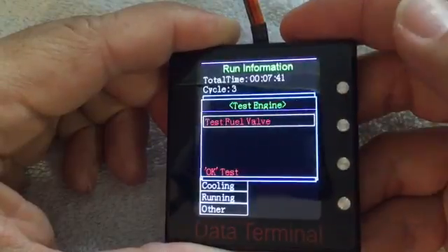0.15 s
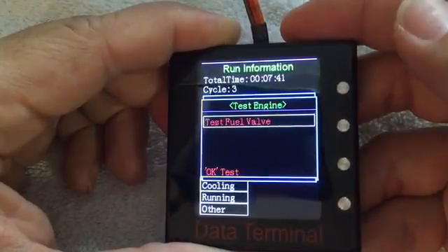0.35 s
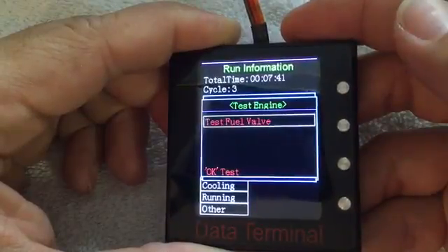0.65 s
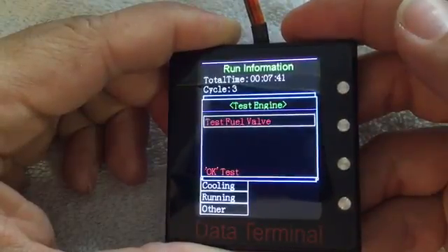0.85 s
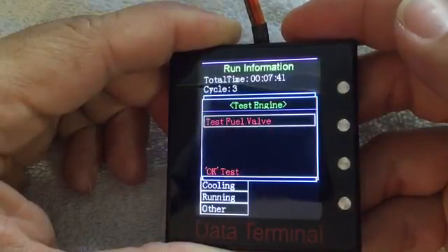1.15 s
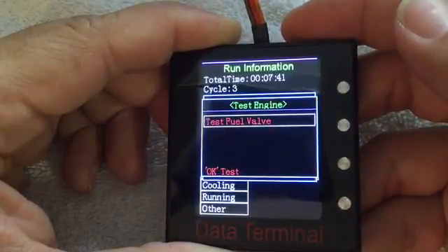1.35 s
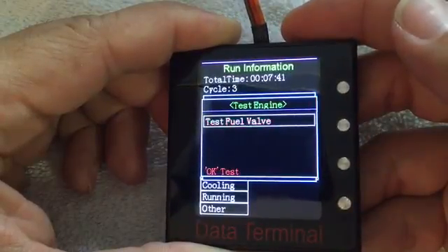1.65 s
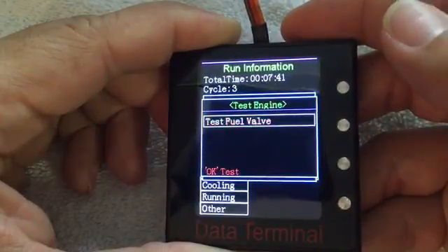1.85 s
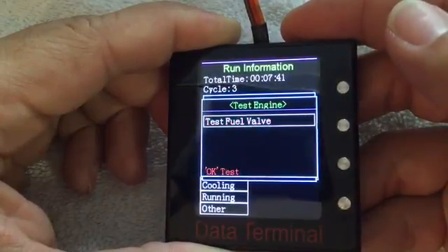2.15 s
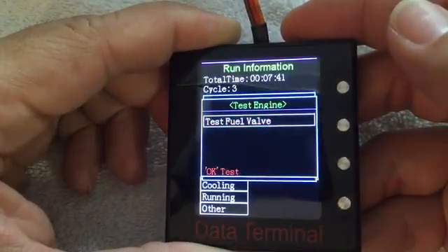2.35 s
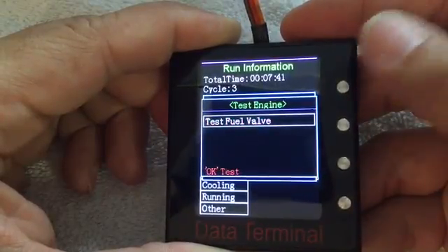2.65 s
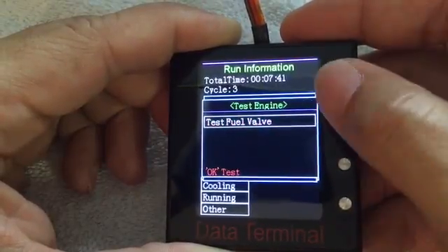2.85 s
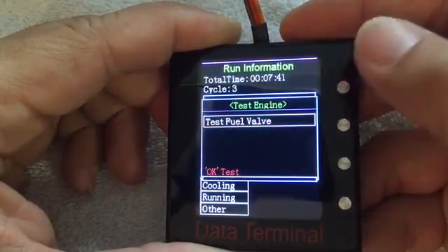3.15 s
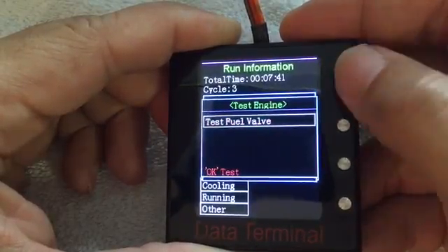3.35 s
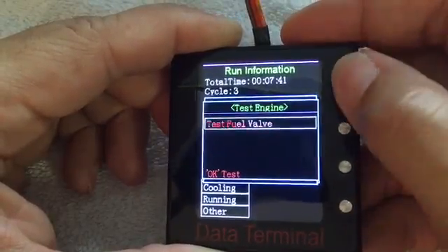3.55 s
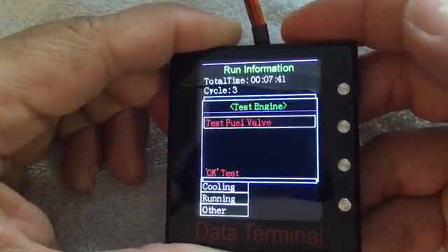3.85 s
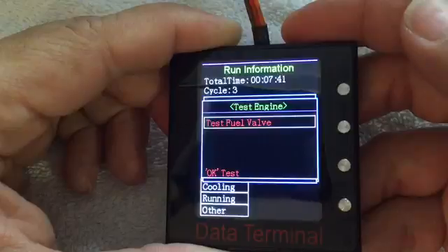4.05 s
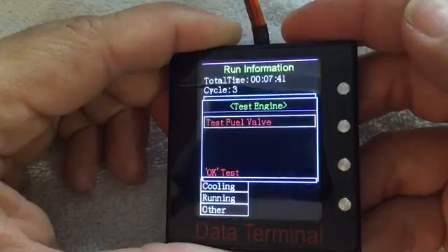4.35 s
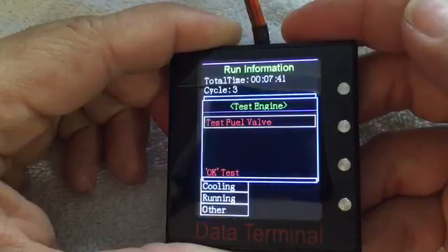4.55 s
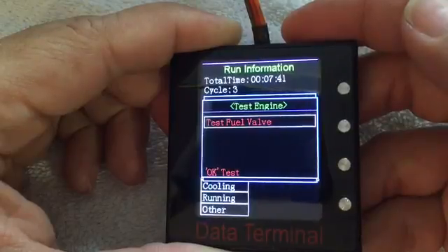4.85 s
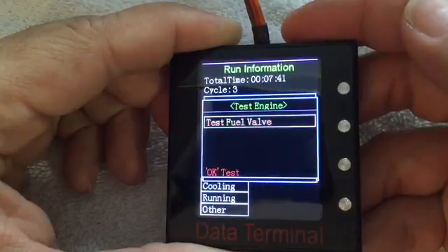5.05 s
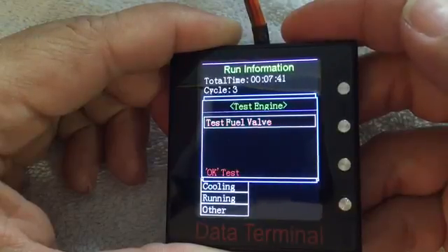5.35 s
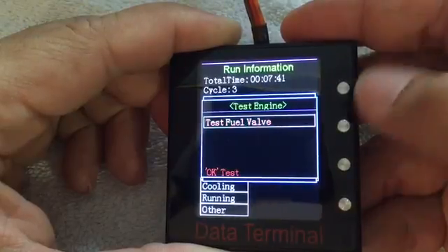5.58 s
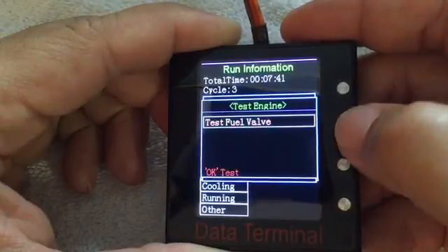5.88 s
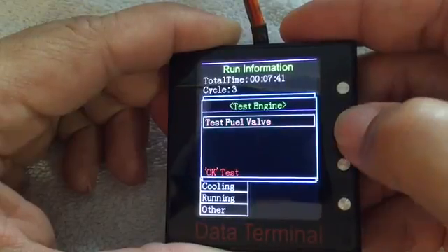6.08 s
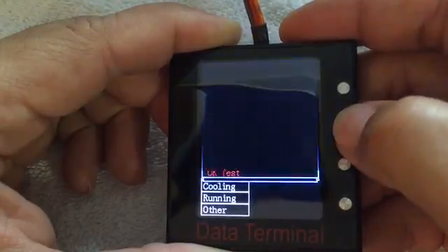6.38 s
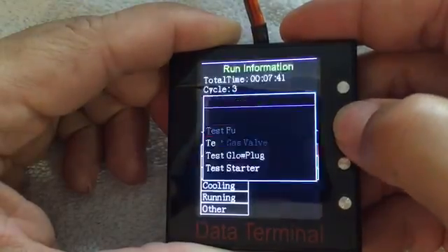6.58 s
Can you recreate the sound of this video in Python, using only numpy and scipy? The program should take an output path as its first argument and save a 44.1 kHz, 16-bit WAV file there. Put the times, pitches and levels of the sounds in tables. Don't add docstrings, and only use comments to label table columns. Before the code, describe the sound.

Sharp, dry metallic clicks alternate between a brighter opening and a slightly softer, rattlier shutting, six in an even row, each with a small table thump and short room ring. Near silence follows, with soft hiss and faint fan drone, then a small button click amid six more valve clicks. Finally two crisp plastic clicks, press and release, sound very near the microphone as the stretch ends.

```python
import sys
import numpy as np
from scipy import signal
from scipy.fft import rfft, irfft, next_fast_len
from scipy.io import wavfile

SR = 44100
rng = np.random.default_rng(int(sys.argv[2]) if len(sys.argv) > 2 else 0)


def ratio_of_db(decibels):
    return 10 ** (np.asarray(decibels, float) / 20)


def transcribe(signal):
    frames = np.atleast_2d(signal).T
    limited = np.clip(frames, -1, 1)
    pcm = np.round(limited * 32767).astype(np.int16)
    wavfile.write(sys.argv[1], SR, pcm)


N = 296352
LENGTH = 16384
GRID = np.fft.rfftfreq(LENGTH, 1 / SR)
AGE = np.arange(LENGTH) / SR

# [f/Hz, level/dB per Hz]
HISS_COLOUR = [(15, -47), (25, -16.5), (53, -6.5), (146, -8), (220, -9), (252, -6.5), (288, -12.5),
               (339, -13), (399, -18.5), (524, -20), (1010, -22.5), (1280, -23), (2980, -24.5),
               (15200, -33.5), (16500, -47.5)]
# [f/Hz, width/Hz, level/dB]
PORT_DIPS = [(5100, 590, -1), (7700, 200, -3), (10400, 330, -6)]
# [f/Hz, width/Hz, level/dB]
FAN_DRONES = [(102, 13, -82), (154.6, 20, -76.5), (203, 8.8, -83), (253.6, 6.7, -80.5)]
# [t/s, peak level/dB rms, half length/s]
HUM_SWELLS = [(0.013, -61, 0.046), (0.9, -67, 0.052), (1.005, -61.5, 0.036), (1.31, -71.5, 0.1),
              (1.908, -65.5, 0.054), (3.027, -67, 0.088), (3.713, -68, 0.069), (3.973, -71, 0.037),
              (4.343, -65.5, .04), (5.33, -67.5, .07), (5.759, -70, 0.048), (6.266, -72.5, .08)]
# [f/Hz, t60/s]
ROOM_DECAY = [(300, 0.16), (1500, .3), (4500, 0.28), (9000, 0.32), (16000, 0.12)]

# [t/s, level/dB energy, touch to landing/ms, first touch/0-1]
PRESSES = [
    (6.405, 0.54, .9, 0.41),
]
# [t/s, level/dB energy, touch to landing/ms, first touch/0-1]
RELEASES = [
    (6.5433, 2.7, 0.91, 0.66),
]
# [t/s, level/dB energy, touch to landing/ms, first touch/0-1]
EASED_RELEASES = [
    (.0535, -37, 1.5, 0.85),
    (.0585, -38.5, 2, 0.98),
    (3.6928, -9.5, .9, 0.65),
    (3.717, -34.5, 2.1, 0.61),
]
# [t/s, level/dB energy, touch to landing/ms, first touch/0-1]
THUMB_TOUCHES = [
    (.0243, -31, 0.77, 0.89),
    (.0282, -21, 0.85, 0.51),
    (6.386, -39, 2.5, 0.68),
    (6.521, -43.5, 2.5, 0.96),
    (6.533, -34, 1.9, 0.61),
    (2.8553, -42, 0.63, 0.77),
    (3.3998, -41.5, .6, 0.76),
    (3.5808, -35.5, 0.65, 0.43),
    (3.585, -43, .8, 0.6),
]
# [f/Hz, width/Hz, level/dB]
CASE_FLEX = [(800, 410, -20)]
# [f/Hz, width/Hz, level/dB]
CASE_PRESSED = [(990, 980, -15), (1570, 530, 0), (2630, 460, -5), (3010, 200, -6), (3500, 320, -12),
                (4100, 520, -4), (5190, 740, -8), (6760, 670, -9), (7610, 260, -17), (8850, 1170, -9),
                (11780, 1140, -15), (13100, 600, -21), (13930, 880, -19), (15320, 320, -20)]
# [f/Hz, width/Hz, level/dB]
CASE_RELEASED = [(1570, 520, 0), (2590, 350, -9), (3050, 490, -12), (4090, 330, -13), (4840, 460, -25),
                 (5680, 110, -38), (6650, 260, -33), (7730, 1270, -42), (9910, 660, -45), (12200, 440, -39),
                 (13390, 640, -43), (14580, 290, -46)]
# [f/Hz, width/Hz, level/dB]
CASE_LET_UP = [(1080, 1810, -11), (1530, 500, 0), (2550, 590, -10), (3610, 210, -16), (4310, 1810, -13),
               (6540, 420, -18), (7430, 430, -22), (8490, 220, -21), (10030, 1810, -27), (12900, 300, -42),
               (14070, 860, -27), (15440, 790, -21)]
# [f/Hz, width/Hz, level/dB]
CASE_THUMBED = [(698, 900, -9), (1400, 700, -3), (2600, 700, -15), (4030, 700, -10), (6500, 3000, -22.5),
                (10800, 4200, -28.5)]
# [f/Hz, level/dB per Hz]
WALLS_PRESSED = [(290, -46), (500, -9), (1040, -13.5), (1520, -2.5), (2260, -10.5), (2890, -3), (4050, -8),
                 (4550, -9.5), (12000, -18), (15600, -27.5), (16500, -42.5)]
# [f/Hz, level/dB per Hz]
WALLS_RELEASED = [(290, -53), (500, -25.5), (680, -31), (822, -17.5), (1680, -5), (2260, -18), (2940, -9),
                  (3770, -20.5), (4050, -27), (14500, -40), (16500, -44)]

# [t/s, opening level/dB energy, shutting level/dB energy]
VALVE_RUNS = [
    (-.03275, .7, -2.8),
    (3.61745, 1.1, -2.8),
]
# [f/Hz, width/Hz, level/dB]
PIPEWORK = [(700, 400, -34.5)]
# [f/Hz, width/Hz, level/dB]
METAL_OPEN = [(1620, 560, -23), (1990, 90, -26), (2270, 120, -19), (2450, 200, -20), (2730, 120, -25),
              (4000, 660, -6), (4330, 140, -5), (4670, 280, -2), (5180, 110, -5), (5550, 420, 0),
              (5890, 230, -3), (6160, 230, -9), (6760, 690, -4), (7910, 120, -14), (8050, 170, -12),
              (8260, 260, -14), (9120, 650, -15), (9660, 310, -17), (9970, 390, -19), (10820, 320, -20),
              (11170, 220, -22), (11640, 470, -24), (12370, 610, -21), (13430, 1150, -29),
              (13810, 300, -26), (14570, 630, -31), (15270, 940, -28)]
# [f/Hz, width/Hz, level/dB]
METAL_SHUT = [(1590, 320, -23), (2320, 420, -13), (2440, 110, -14), (3310, 520, -17), (3970, 360, -1),
              (4340, 150, -9), (4660, 220, 0), (5510, 590, -4), (7100, 530, -17), (7680, 130, -19),
              (7950, 400, -14), (8740, 410, -15), (9170, 360, -14), (9630, 610, -18), (10060, 280, -16),
              (10960, 480, -6), (11580, 220, -16), (12380, 920, -17), (12490, 80, -19), (13150, 260, -17),
              (13510, 180, -25), (13900, 260, -15), (14320, 240, -23), (14700, 330, -25), (15140, 120, -18),
              (15490, 830, -17)]
# [f/Hz, level/dB against the stroke, rise/s, t60/s]
THUMP_OPEN = [
    (427, -42.5, 0.0013, .09),
    (790, -65, 0.0042, 0.032),
    (2300, -54, 0.0054, .06),
]
# [f/Hz, level/dB against the stroke, rise/s, t60/s]
THUMP_SHUT = [
    (438, -46, 0.0023, .09),
    (797, -59.5, 0.005, 0.052),
    (2375, -36.5, 0.0063, .06),
]
# [f/Hz, level/dB per Hz]
OPENING_TO_WALLS = [(290, -47.5), (500, -12.5), (623, -21.5), (799, -16.5), (1150, -31.5), (1450, -16.5),
                    (2130, -21.5), (2390, -12.5), (2940, -23.5), (4170, 0), (5270, -12), (5840, -3),
                    (6280, -12), (15100, -27), (16500, -41.5)]
# [f/Hz, level/dB per Hz]
SHUTTING_TO_WALLS = [(290, -46.5), (500, -16.5), (641, -20), (822, -8), (885, -32), (1520, -12.5),
                     (1790, -20), (2390, -4), (2610, -16.5), (3400, -13.5), (4110, 3), (6560, -18),
                     (11300, -9.5), (15600, -17.5), (16500, -39)]
# [f/Hz, width/Hz, level/dB]
LINGERING_OPEN = [(3710, 31, -8), (4100, 17, -4), (4092, 21, -3.5), (4480, 29, -0.5), (4660, 100, -10),
                  (5400, 40, -3), (5850, 45, 0), (8000, 50, -17), (9050, 35, -17), (11100, 100, -20)]
# [f/Hz, width/Hz, level/dB]
LINGERING_SHUT = [(2439, 86, -7), (3740, 26, -1), (4110, 32, 1), (4320, 33, -4), (4730, 170, -10),
                  (5500, 38, -4), (5740, 110, -7), (9390, 39, -27.5), (10100, 48, -18), (11230, 140, -11.5),
                  (11600, 46, -8)]


def unit(x):
    return x / np.sqrt(np.mean(x ** 2) + 1e-20)


def along(points, hz):
    f, value = np.transpose(points)
    return np.interp(np.log(hz + 1), np.log(f + 1), value)


def resonances(modes, f):
    power = 0
    for centre, width, db in modes:
        damping = (f * width) ** 2
        peak = damping / ((centre * centre - f * f) ** 2 + damping)
        power = power + ratio_of_db(2 * db) * peak ** 2
    return np.sqrt(power)


def noise(gain):
    m = next_fast_len(N + 8192)
    white = rfft(rng.standard_normal(m))
    return unit(irfft(white * gain(np.fft.rfftfreq(m, 1 / SR)), m)[:N])


def background():
    def hiss_gain(f):
        dips = sum(db * np.exp(-((f - hz) / width) ** 2) for hz, width, db in PORT_DIPS)
        level = along(HISS_COLOUR, np.minimum(f, 15000)) + dips
        return (f < 15770) * ratio_of_db(level)

    hiss = ratio_of_db(-68.5) * noise(hiss_gain)
    drones = 0
    for hz, width, db in FAN_DRONES:
        drones = drones + ratio_of_db(db) * noise(lambda f: resonances([(hz, width, 0)], f))
    t = np.arange(N) / SR
    waver = noise(lambda f: f < 5)
    hum = np.sqrt(2) * np.sin(2 * np.pi * 256 * t + 0.8 * waver)
    swell = sum(ratio_of_db(db) * np.exp(-((t - s) / half) ** 2) for s, db, half in HUM_SWELLS)
    return hiss + drones + swell * hum


def answer(colour, rise, linger=()):
    hz, t, cells = signal.stft(rng.standard_normal(LENGTH), SR, nperseg=256)
    fade = ratio_of_db(-60 * t / along(ROOM_DECAY, hz)[:, None])
    decay = signal.istft(cells * fade, SR, nperseg=256)[1][:LENGTH]
    gain = np.hypot(ratio_of_db(along(colour, GRID) - 7.0), resonances(linger, GRID))
    build_up = np.clip(AGE / rise, 0, 1) ** 2
    tail = irfft(rfft(decay) * gain) * build_up * (AGE < 0.3)
    return tail / np.linalg.norm(tail)


def nearby(db, t60):
    scatter = rng.standard_normal(LENGTH) * ratio_of_db(-60 * AGE / t60) * np.clip(AGE / 0.00069, 0, 1)
    return 1 + ratio_of_db(db) * rfft(scatter / np.linalg.norm(scatter))


def causal(gain):
    cepstrum = irfft(np.log(gain + 1e-6))
    cepstrum[1:LENGTH // 2] *= 2
    cepstrum[LENGTH // 2 + 1:] = 0
    return np.exp(rfft(cepstrum))


def contact(gap_ms, touch):
    late = np.exp(-2j * np.pi * GRID * gap_ms / 1000)
    touch = np.clip(touch, 0, 0.9)
    return (late - touch) / (1 - touch * late)


def sluggish(lag_ms, hz):
    return np.exp(-2j * np.pi * lag_ms / 1000 * hz * np.arctan(GRID / hz))


def add(track, s, db, response, tail):
    click = irfft(response) * (AGE < 0.2)
    sound = click / np.linalg.norm(click) + tail
    track[round((s + 1) * SR):][:LENGTH] += ratio_of_db(db) * sound


def buttons():
    track = np.zeros(N + 2 * SR)
    kinds = [(PRESSES, CASE_PRESSED, WALLS_PRESSED, -27),
             (RELEASES, CASE_RELEASED, WALLS_RELEASED, -28),
             (EASED_RELEASES, CASE_LET_UP, WALLS_RELEASED, -25),
             (THUMB_TOUCHES, CASE_THUMBED, WALLS_RELEASED, -18)]
    for events, case, walls, room_db in kinds:
        for s, db, gap_ms, touch in events:
            blow = contact(gap_ms, touch) * contact(0.43 * gap_ms, 0.626)
            blow = blow * sluggish(1.4, 1500) * nearby(db=-19, t60=0.04)
            ring = causal(resonances(CASE_FLEX + case, GRID))
            room = ratio_of_db(room_db) * answer(walls, rise=0.0099)
            add(track, s, db, blow * ring, room)
    return track[SR:][:N]


def timer():
    cycle_s, held_s = 0.59743, 0.3015
    opening, shutting = [], []
    for s, open_db, shut_db in VALVE_RUNS:
        for k in range(3):
            opening.append((s + k * cycle_s, open_db))
            shutting.append((s + k * cycle_s + held_s, shut_db))
    return opening, shutting


def strokes(events, body, mount, walls, linger, blow, room_db):
    track = np.zeros(N + 2 * SR)
    thump = 0
    for hz, db, rise, t60 in mount:
        swell = 1 - np.exp(-(AGE / rise) ** 2)
        thump = thump + ratio_of_db(db - 60 * AGE / t60) * swell * np.sin(2 * np.pi * hz * AGE)
    room = answer(walls, 0.0089, linger)
    for s, db in events:
        modes = [(hz, width, level + rng.normal(0, 1.0)) for hz, width, level in body]
        tail = ratio_of_db(room_db) * (0.85 * room + 0.5 * answer(walls, 0.012, linger))
        add(track, s, db, blow * causal(resonances(modes, GRID)), tail + thump)
    return track[SR:][:N]


def valve():
    chatter_ms = 0.43 / (1 + (8500 / (GRID + 1)) ** 12)
    slam = contact(0.081, 0.21) * contact(chatter_ms, 0.68)
    slam = slam * sluggish(0.6, 2100) * nearby(db=-13.5, t60=0.04)
    settle = contact(0.41, 0.61) * contact(0.1, 0.85)
    settle = settle * sluggish(0.67, 1800) * nearby(db=-12, t60=0.063)
    opening, shutting = timer()
    opens = strokes(opening, PIPEWORK + METAL_OPEN, THUMP_OPEN, OPENING_TO_WALLS, LINGERING_OPEN,
                    slam, room_db=-19.5)
    shuts = strokes(shutting, PIPEWORK + METAL_SHUT, THUMP_SHUT, SHUTTING_TO_WALLS, LINGERING_SHUT,
                    settle, room_db=-20.0)
    return opens + shuts


def scene():
    return (valve() + buttons() + background())[None]


def band_limit(x):
    return signal.sosfilt(signal.butter(12, 17090, fs=SR, output="sos"), x)


def record(dry):
    heard = signal.sosfilt(signal.butter(2, 42, "high", fs=SR, output="sos"), dry)
    heard = signal.sosfiltfilt(signal.butter(12, 16360, fs=SR, output="sos"), heard)
    return band_limit(heard)


dry = scene()
out = record(dry)
transcribe(out)
```